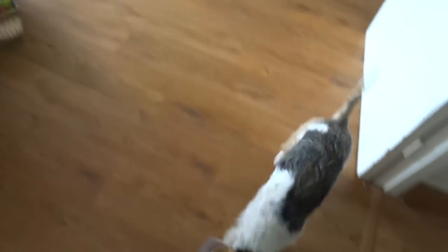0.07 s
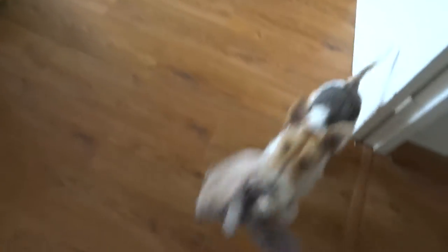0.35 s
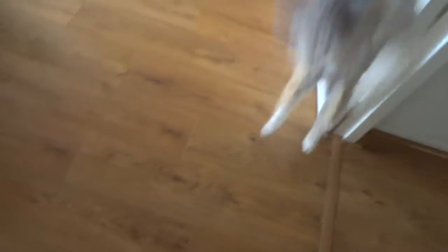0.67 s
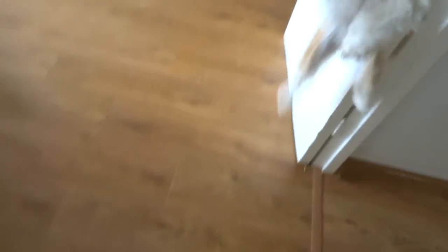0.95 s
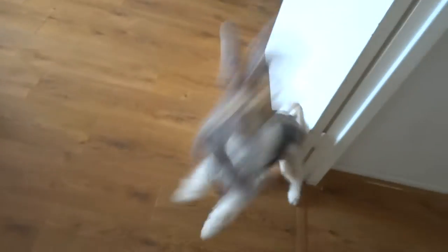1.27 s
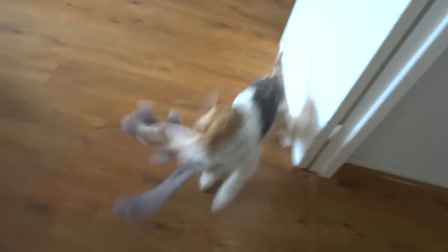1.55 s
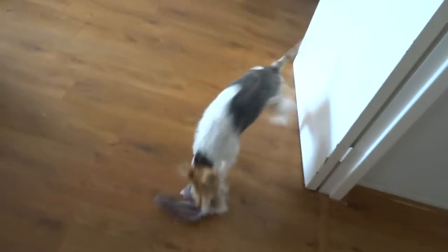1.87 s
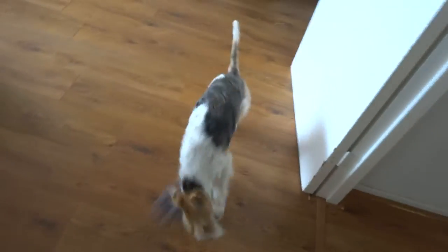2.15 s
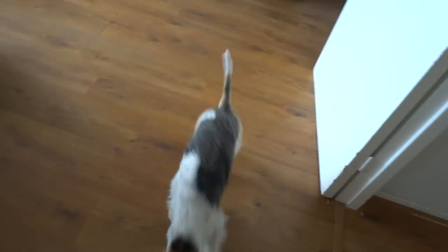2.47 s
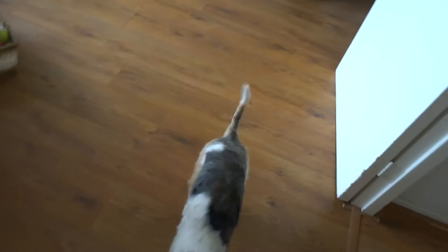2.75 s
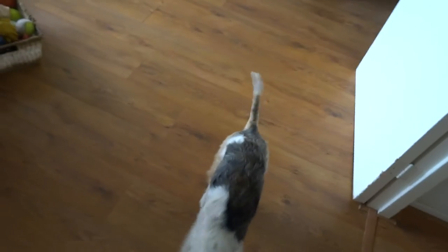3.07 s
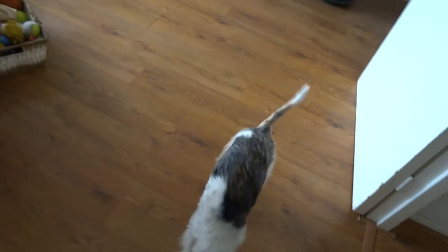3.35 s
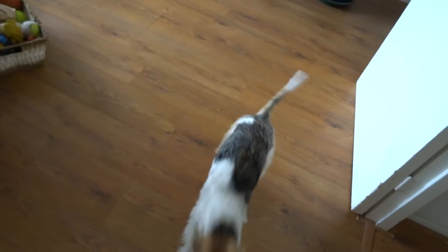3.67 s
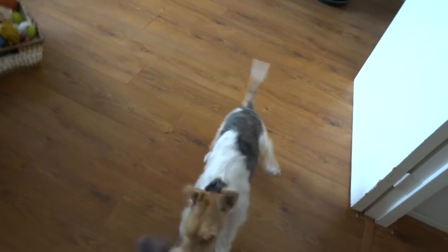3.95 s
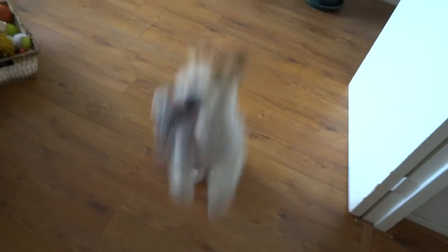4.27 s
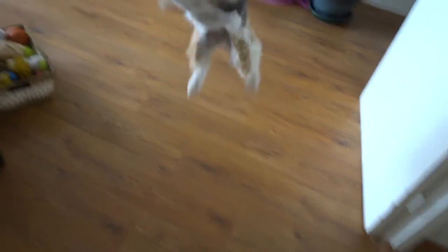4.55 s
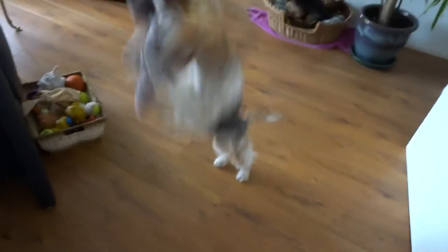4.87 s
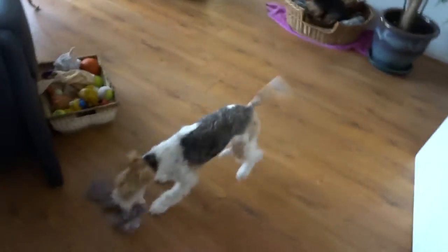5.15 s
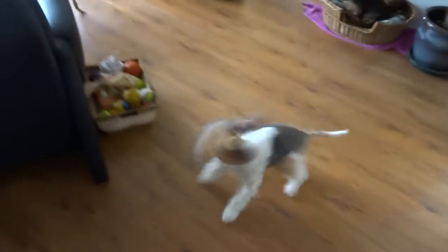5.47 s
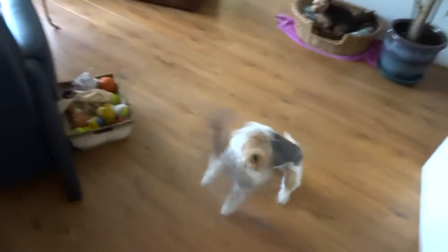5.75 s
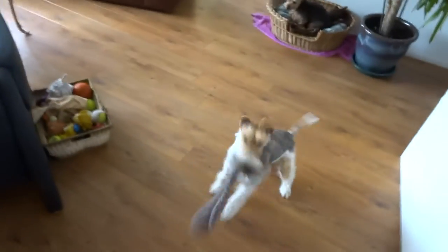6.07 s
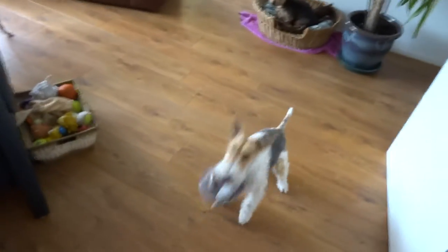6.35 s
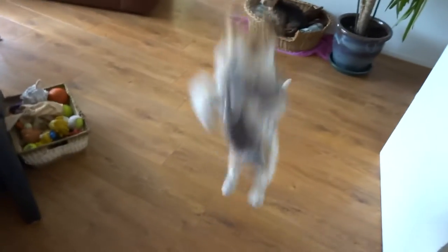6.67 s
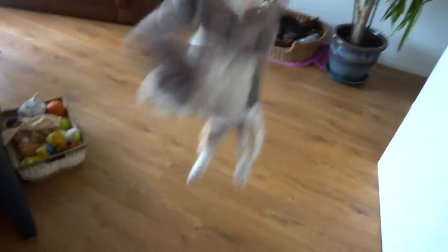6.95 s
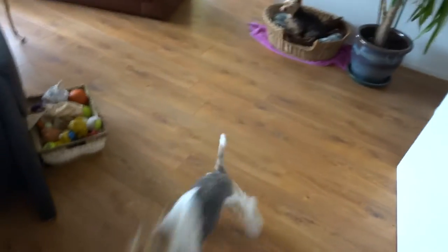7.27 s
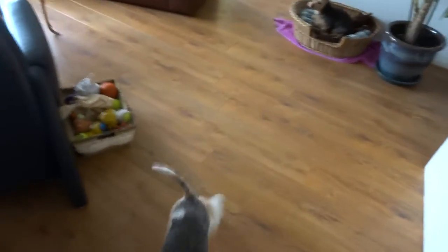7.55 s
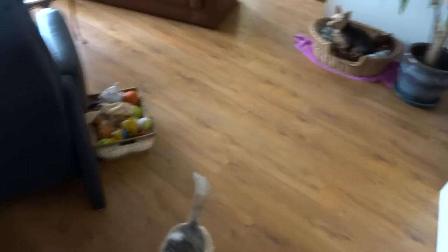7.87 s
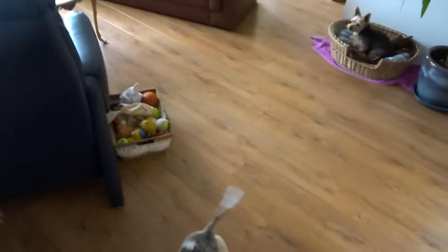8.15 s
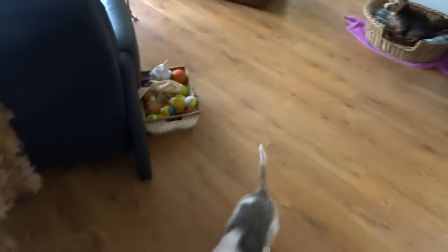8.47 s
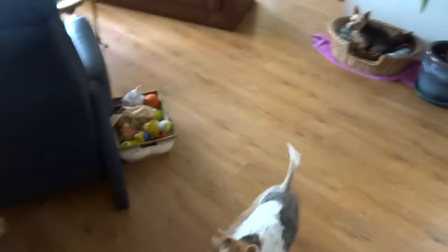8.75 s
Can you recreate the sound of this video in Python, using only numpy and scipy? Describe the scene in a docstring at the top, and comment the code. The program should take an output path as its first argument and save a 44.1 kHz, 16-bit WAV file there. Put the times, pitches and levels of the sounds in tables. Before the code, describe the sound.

Paws thump and scrabble on laminate in a quiet room, with breathy huffs and two brief high whines that break into yelps.

```python
"""A terrier leaps about with a cloth toy on a laminate floor, over the faint air and hum of a bare room.
From the start its claws skid and click, and its paws and the toy thump the boards and set them ringing.
It huffs, and at the top of a leap, about 1 s in, a thin whistling whine breaks into a yelp.
More scrabbling and huffing lead to a second whine and yelp near 4.9 s, then a flurry of landings.
The hum swells around 7.5 s, and one more heavy bump and a few lighter steps close the scene."""
import sys
import numpy as np
from scipy import signal
from scipy.fft import rfft, irfft
from scipy.io import wavfile

SR = 44100
rng = np.random.default_rng(int(sys.argv[2]) if len(sys.argv) > 2 else 0)


def dump_mix(stems):
    """Bounce the given channels to the path in sys.argv[1] as a 16-bit WAV at rate SR."""
    frames = np.atleast_2d(stems).T  # one column per channel
    limited = np.clip(frames, -1, 1)  # hard clip at full scale
    pcm = np.round(limited * 32767).astype(np.int16)
    wavfile.write(sys.argv[1], SR, pcm)


N = 392931
TIME = np.arange(N) / SR

# tone of the room air: f/Hz, level/dB
AIR_EQ = [(20, -6), (36, -9), (52, -18), (110, -11), (350, -4.5), (700, -7.5), (1400, -13), (2800, -19.5),
          (4500, -30.5), (11000, -31.5)]
# scrabbles for grip as the dog brakes or pushes off, and one faint scuff of the toy at 8.145 s: t/s, length/s,
# relative level/dB
SKIDS = [(0.0, 0.0066, -28.5), (0.26, 0.024, -29), (1.018, 0.033, -26), (1.178, 0.041, -25),
         (1.459, 0.19, -27), (1.694, 0.14, -22.5), (2.122, .066, -30), (2.609, 0.16, -29),
         (3.876, 0.076, -24.5), (4.962, 0.13, -23.5), (5.699, 0.047, -22.5), (6.371, 0.055, -30.5),
         (6.47, 0.014, -28.5), (7.157, 0.06, -20.5), (7.303, 0.098, -24), (7.452, 0.12, -23),
         (7.736, 0.065, -31.5), (8.145, 0.047, -40), (8.578, 0.088, -33.5)]
# tone of a claw on laminate: f/Hz, level/dB
CLAW_EQ = [(150, -11), (400, -1.5), (800, -6), (1400, -4.5), (2200, -2), (2800, 4), (3400, 5.5), (4200, -1),
           (6000, 0), (8000, -1.5), (9500, 0.5), (10700, 1)]
# body or toy landing without claws: t/s, relative level/dB, contact cutoff/Hz
SOFT_BUMPS = [(0.022, -31, 95), (0.85, -29, 106), (0.981, -24, 170), (1.069, -28.5, 110), (1.243, -29, 100),
              (2.645, -28.5, 1300), (3.91, -30, 750), (5.028, -14.5, 805), (5.367, -15.5, 815),
              (5.466, -21.5, 1190), (5.621, -28, 110), (5.88, -24.5, 400), (7.345, -19.5, 1190),
              (8.149, -10.5, 650)]
# ring of the boards: f/Hz, level/dB, t60/s
BOARD_MODES = [(80, -11, 0.83), (142.3, -18, 0.22), (201, -5.5, 0.19), (263.4, 4.5, 0.082), (321, 4, 0.062),
               (382.8, -5, 0.15), (477.4, 2, 0.038), (626, 12.5, 0.008), (823, -9, 0.024), (1151, 5, 0.015)]
# paws landing, claws and pad together: t/s, relative claw level/dB, relative pad level/dB
PAW_HITS = [(0.232, -15.5, -41), (0.263, -20, -36.5), (0.3687, -17.5, -34), (0.4205, -15.5, -32.5),
            (0.5113, -24.5, -54), (0.6595, -35, -55), (1.16, -8, -18), (1.3126, -9.5, -14.5),
            (1.4438, -11, -46), (1.6878, -11, -22), (2.009, -15, -37), (2.1942, -12.5, -25.5),
            (2.3397, -11, -26), (2.5396, -17, -32), (2.641, -11, -26.5), (3.199, -31.5, -73),
            (3.263, -23, -41), (3.2968, -19, -37), (3.7105, -21.5, -44), (3.8436, -22.5, -37),
            (4.1227, -20, -44), (4.2145, -17.5, -30.5), (4.8682, -13.5, -20.5), (5.257, -10.5, -45),
            (5.4256, -13.5, -28), (5.5545, -8.5, -24.5), (5.6506, -13.5, -41), (5.6981, -10.5, -23),
            (5.8091, -9, -19.5), (5.9224, -12, -30.5), (6.0614, -18.5, -30.5), (6.366, -21.5, -30),
            (6.4721, -13, -33.5), (7.1465, -8, -21.5), (7.2941, -10, -12), (7.9708, -23.5, -40.5),
            (8.3989, -23.5, -44), (8.4423, -20.5, -38), (8.537, -17.5, -26.5), (8.8738, -16.5, -29)]
# huffs of breath: t/s, length/s, level/dB
HUFF_CUES = [(0.664, 0.063, -49), (1.114, 0.053, -25.5), (3.561, 0.17, -44.5), (4.161, 0.042, -36),
             (4.802, 0.049, -38), (5.045, 0.04, -27), (6.208, 0.19, -36.5), (6.935, 0.085, -38.5),
             (7.057, 0.033, -23.5), (7.098, 0.058, -33)]
# tone of breath through the muzzle: f/Hz, level/dB
MUZZLE_EQ = [(300, -28), (1000, -15), (1400, 0), (2000, 0), (2600, -8), (4000, -19), (10000, -34)]
# whistling whines: t/s, length/s, first f/Hz, last f/Hz, peak level/dB
WHINE_CUES = [(0.919, 0.046, 5330, 5680, -24.5), (1.02, .026, 5100, 5600, -28),
              (4.826, 0.029, 5600, 5400, -37)]
# yelps, the first in two pieces: t/s, length/s, first f/Hz, target f/Hz, relative level/dB, onset rasp/0-1
YELP_CUES = [(0.962, 0.04, 1066, 871, -9.5, 0.07), (0.995, 0.032, 878, 830, -8, 0.03),
             (4.862, .158, 883, 1014, -10.5, 0.73)]
# formants of throat and mouth: f/Hz, level/dB
THROAT_EQ = [(300, -16), (600, -26), (850, -2.5), (1050, -5), (1400, -14), (2000, -27.5), (2400, -28),
             (2750, -7.5), (3100, -23.5), (3500, -22.5), (4100, -33), (11000, -41)]
# left microphone against the right: f/Hz, level/dB
LEFT_MIC_EQ = [(150, 0), (700, -1.1), (10000, -2)]


def from_db(db):
    """Decibels to gain."""
    return 10 ** (np.asarray(db) / 20)


def unit_rms(x):
    """Scale to rms 1."""
    return x / np.sqrt(np.mean(x ** 2) + 1e-20)


def unit_energy(x):
    """Scale to a sum of squares of 1."""
    return x / np.sqrt(np.sum(x ** 2) + 1e-20)


def eq_db(curve, hz):
    """Read an EQ curve along log frequency."""
    curve_hz, curve_db = np.array(curve).T
    return np.interp(np.log(np.maximum(hz, 1)), np.log(curve_hz), curve_db)


def equalise(x, curve, size=4096):
    """Minimum-phase EQ, so nothing rings ahead of a hit."""
    cepstrum = irfft(np.log(from_db(eq_db(curve, np.fft.rfftfreq(size, 1 / SR)))))
    cepstrum[1:size // 2] *= 2
    cepstrum[size // 2 + 1:] = 0
    return signal.fftconvolve(x, irfft(np.exp(rfft(cepstrum))))[:len(x)]


def low_pass(x, hz, order=2):
    """Butterworth low-pass."""
    return signal.sosfilt(signal.butter(order, hz, fs=SR, output="sos"), x)


def wobble(count, hz):
    """Random modulation of rms 1, rolled off above hz."""
    return unit_rms(low_pass(rng.standard_normal(count + SR // 4), hz)[SR // 4:])


def add(track, start, sound):
    """Mix a stereo sound into a track at a time in seconds."""
    at = round(start * SR)
    track[:, at:at + sound.shape[1]] += sound[:, :N - at]


def in_room(x, wet_db, side_db, wall_hz=20000, t60=.64, treble_t60=.35, treble_hz=6240):
    """Direct sound, strong early reflections, then a diffuse tail whose treble dies first; new per spot."""
    t = TIME[:SR * 3 // 5]
    early_lift = 1 + from_db(-4) * np.exp(-t / .012)
    noise = rng.standard_normal((2, len(t))) * early_lift
    dull = low_pass(noise, treble_hz, order=1)
    tails = dull * from_db(-60 * t / t60) + (noise - dull) * from_db(-60 * t / treble_t60)
    mid, side = (low_pass(unit_energy(tail), wall_hz, order=1) for tail in tails)
    response = from_db(wet_db) * (mid + from_db(side_db) * side * [[1], [-1]])
    response[:, 0] += 1   # the direct sound sits dead centre
    return signal.fftconvolve(x[None], response, axes=1) / np.sqrt(1 + from_db(wet_db) ** 2)


def room_tone(air_db=-44.5, side_db=-14, hum_hz=87, rest_db=-60, swell_db=18.5, peak_s=7.5):
    """A bed of quiet air and a wavering low hum that swells once."""
    mid, side = (unit_rms(equalise(noise, AIR_EQ)) for noise in rng.standard_normal((2, N)))
    swell = np.interp(TIME - peak_s, [-.29, 0, 1.2], [0, 1, 0])
    hum_db = rest_db + swell_db * swell + 2 * wobble(N, 14)
    hum = from_db(hum_db) * unit_rms(np.sin(2 * np.pi * hum_hz * TIME + wobble(N, 1.1)))
    return from_db(air_db) * (mid + from_db(side_db) * side * [[1], [-1]]) + hum


def grains(count, per_s, spread_db):
    """Random tiny impacts of uneven size."""
    sizes = from_db(spread_db * np.minimum(rng.exponential(1, count), 4))
    return sizes * rng.standard_normal(count) * (rng.random(count) < per_s / SR)


def arch(t, length):
    """A rounded swell of the given length."""
    return np.sqrt(np.abs(np.sin(np.pi * np.clip(t / length, 0, 1))))


def stick_slip(t, length, judder_db=3):
    """Claws catch and slip over the embossed grain of the boards; energy 1."""
    slips = grains(len(t), per_s=2500, spread_db=0) * from_db(judder_db * wobble(len(t), 73))
    return unit_energy(equalise(slips * arch(t, length), CLAW_EQ))


def claw_skids(gain_db=4):
    """The claws slide as the dog scrabbles, and once the toy scuffs the floor; a longer slide carries more
    energy."""
    out, t = np.zeros((2, N)), TIME[:SR // 4]
    for start, length, level_db in SKIDS:
        skid = stick_slip(t, length) * np.sqrt(length * SR)
        add(out, start, in_room(from_db(level_db + gain_db) * skid, wet_db=7.5, side_db=-11))
    return out


def board_hit(t, modes, thud_db=-5, thud_s=.018, vary_db=3.5):
    """One padded contact: a short thud, and every mode rung with a strength of its own."""
    strengths = from_db(vary_db * rng.standard_normal(len(modes))) * rng.choice([-1, 1], len(modes))
    thud = rng.standard_normal(len(t)) * np.exp(-t / thud_s)
    return unit_energy(strengths @ modes) + from_db(thud_db) * unit_energy(low_pass(thud, 790, order=1))


def floor_thumps(gain_db=32, pad_db=-2, pad_hz=560, gap_s=.02, gap_spread=.2006, loss_db=2):
    """Weight settles on the boards in three fading contacts; each blow is rounded off above its own contact
    cutoff."""
    out, t = np.zeros((2, N)), TIME[:SR // 3]
    hz, mode_db, t60 = np.array(BOARD_MODES).T[:, :, None]
    modes = np.sin(2 * np.pi * hz * t) * from_db(mode_db - 60 * t / t60)
    pads = [(start, weight_db + pad_db, pad_hz) for start, _, weight_db in PAW_HITS]
    for start, level_db, contact_hz in pads + SOFT_BUMPS:
        thump = np.zeros(len(t))
        for k in range(3):
            lag = int(k * gap_s * (1 + gap_spread * rng.uniform(-.98, 1)) * SR)
            thump[lag:] += from_db(-k * loss_db) * board_hit(t, modes)[:len(t) - lag]
        thump = low_pass(thump, contact_hz)
        thump = unit_energy(equalise(thump, [(40, -34.5), (130, 4.5)]))   # a plank radiates little sub
        add(out, start, in_room(from_db(level_db + gain_db) * thump, wet_db=-1, side_db=-17))
    return out


def claw_clicks(gain_db=24, patter_s=.02, slip_delay_s=.017, slip_s=.037, slip_db=-11):
    """One claw ticks first, the others patter down just behind it, and the paw slips a little."""
    out, t = np.zeros((2, N)), TIME[:SR // 10]
    for start, level_db, _ in PAW_HITS:
        ticks = unit_energy(grains(len(t), per_s=900, spread_db=-5.5) * np.exp(-t / patter_s))
        ticks[0] += 1   # the leading claw
        slip = from_db(slip_db) * stick_slip(t - slip_delay_s, slip_s)
        paw = unit_energy(equalise(ticks, CLAW_EQ)) + slip
        add(out, start, in_room(from_db(level_db + gain_db) * paw, wet_db=14, side_db=-11))
    return out


def huffs(flutter_db=2):
    """Air forced past the toy in the dog's mouth."""
    out, t = np.zeros((2, N)), TIME[:SR // 3]
    for start, length, level_db in HUFF_CUES:
        air = unit_rms(equalise(rng.standard_normal(len(t)), MUZZLE_EQ))
        huff = air * arch(t, length) * from_db(level_db + flutter_db * wobble(len(t), 99))
        add(out, start, in_room(huff, wet_db=4.5, side_db=-13))
    return out


def call_time(length, fade_s):
    """Seconds into a call, the share of it that has passed, and a fade at both ends."""
    t = TIME[:int(length * SR)]
    return t, t / length, np.clip(np.minimum(t, length - t) / fade_s, 0, 1)


def whines(swell_db=12, peak_share=.97, octave_db=-7, jitter=.006):
    """A thin whistle through the nose, with its octave; it swells and bends towards its end."""
    out = np.zeros((2, N))
    for start, length, first_hz, last_hz, peak_db in WHINE_CUES:
        _, share, fade = call_time(length, fade_s=.002)
        pitch = first_hz + (last_hz - first_hz) * share ** 3
        level_db = peak_db - swell_db * np.interp(share, [0, peak_share, 1], [1, 0, 1])
        phase = 2 * np.pi * np.cumsum(pitch * (1 + jitter * wobble(len(pitch), 490))) / SR
        whistle = unit_rms(np.sin(phase) + from_db(octave_db) * np.sin(2 * phase))
        add(out, start, in_room(fade * from_db(level_db) * whistle, wet_db=-4.5, side_db=-5))
    return out


def yelp_gesture(length, first_hz, target_hz, top_db, onset_rough):
    """A yelp bursts out, glides in pitch, settles to a slight rasp, holds and falls away."""
    glide_share, hold_share = .3, .5
    rest_rough, settle_s = .2, .029
    fall_db, rough_loss_db, tremble_db = 13.5, 13, 2
    t, share, fade = call_time(length, fade_s=.0055)
    pitch = target_hz + (first_hz - target_hz) * np.exp(-share / glide_share)
    rough = rest_rough + (onset_rough - rest_rough) * np.exp(-(t / settle_s) ** 2)
    release_db = np.interp(share, [hold_share, 1], [0, fall_db])
    level_db = top_db - release_db - rough_loss_db * rough + tremble_db * wobble(len(t), 48)
    return fade, pitch, level_db, rough


def yelps(jitter=.065, rasp_db=2, shimmer=.7, flicker_db=3):
    """Vocal folds drive throat and mouth; strained, they beat unevenly and let air through in puffs."""
    out = np.zeros((2, N))
    for start, *shape in YELP_CUES:
        fade, pitch, level_db, rough = yelp_gesture(*shape)
        count = len(pitch)
        phase = 2 * np.pi * np.cumsum(pitch * (1 + jitter * np.sqrt(rough) * wobble(count, 330))) / SR
        tone = from_db(eq_db(THROAT_EQ, pitch)) * np.sin(phase)
        for k in range(2, 9):
            # uneven closing of the folds makes the overtones flicker and smear
            flicker = flicker_db * wobble(count, 105)
            smear = k * rough * wobble(count, 340)
            tone += from_db(eq_db(THROAT_EQ, k * pitch) + flicker) * np.sin(k * phase + smear)
        tone = unit_rms(tone) * (1 + shimmer * rough * wobble(count, 250))
        puffs = rng.standard_normal(count) * (1 + np.cos(phase))
        rasp = unit_rms(equalise(puffs, THROAT_EQ))
        voice = np.sqrt(1 - rough ** 2) * tone + from_db(rasp_db) * rough * rasp
        voice *= fade * from_db(level_db)
        # the head is close and on-mic, so few overtones reach the walls
        add(out, start, in_room(voice, wet_db=-7.5, side_db=-8, wall_hz=1800))
    return out


def scene():
    """The mix: feet, voice and room tone."""
    return claw_clicks() + claw_skids() + floor_thumps() + yelps() + whines() + huffs() + room_tone()


def record(dry, cutoff_hz=10990):
    """The left microphone is a little duller; a steep high cut takes the top off both sides."""
    heard = np.array([equalise(dry[0], LEFT_MIC_EQ), dry[1]])
    return signal.sosfilt(signal.ellip(12, .1, 80, cutoff_hz, fs=SR, output="sos"), heard)


dry = scene()
out = record(dry)
dump_mix(out)
```